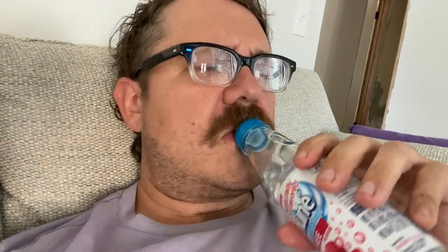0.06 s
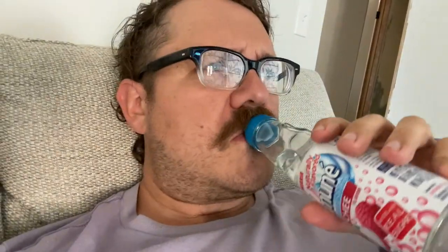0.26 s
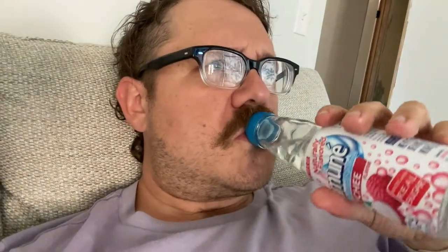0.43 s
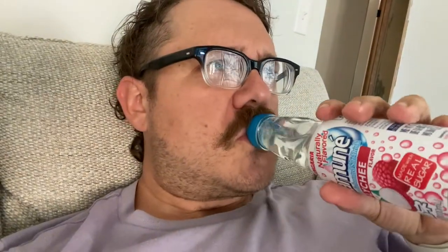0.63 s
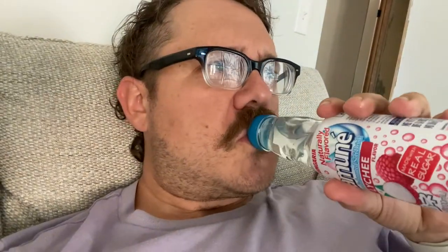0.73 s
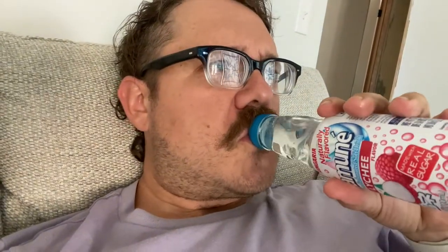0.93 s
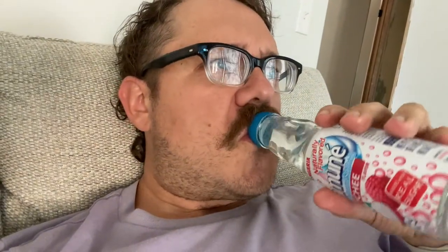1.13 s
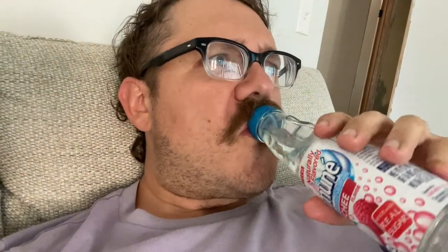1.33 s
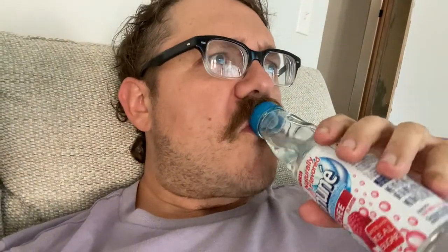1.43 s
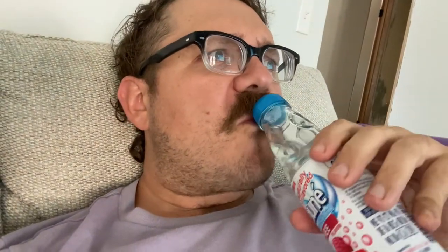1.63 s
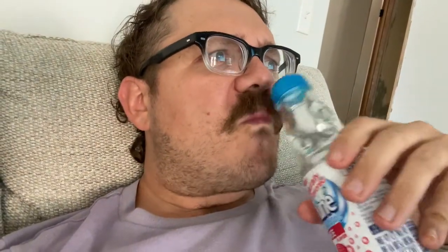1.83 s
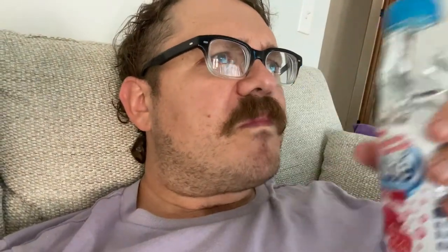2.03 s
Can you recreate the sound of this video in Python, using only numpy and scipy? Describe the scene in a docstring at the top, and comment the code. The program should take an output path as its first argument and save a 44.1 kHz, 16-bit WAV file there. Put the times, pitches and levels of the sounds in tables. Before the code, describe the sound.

A glass marble in a soda bottle neck rolls barely audibly from 0.4 seconds, then clinks in a light, quick, fading cluster at 0.7. Sparse faint ticks follow until 1.4, with a tiny hiss and bubbles near 1.33. At 1.44 it drops back in a loud, bright rattle with short bubble plips, fading by 1.6. One faint bubble at 1.87. Close, small room, low steady hum throughout.

```python
"""A low machine hum and air rumble run throughout, as slightly wavering tones and shaped noise.
A glass marble rolls faintly in the neck of a tipped soda bottle (uneven noise driving the glass modes), then ticks.
As the bottle is lowered the drink hisses (a narrow rising noise band) and bubbles ring (decaying, rising sines).
The marble drops back and rattles: each contact sums decaying glass modes and a short crack, damped by the drink.
A small living room answers every bottle sound with early echoes and a swelling noise tail."""
import sys
import numpy as np
from scipy import signal
from scipy.fft import rfft, irfft, next_fast_len
from scipy.io import wavfile
from scipy.ndimage import map_coordinates

SR = 44100
rng = np.random.default_rng(int(sys.argv[2]) if len(sys.argv) > 2 else 0)


def unload_audio(sound):
    """Save the sound as a 16-bit wav file, at the path given as the first command line argument."""
    columns = np.transpose(np.atleast_2d(sound))
    # keep every value between -1 and 1, then stretch to whole-number steps
    steps = np.round(np.clip(columns, -1, 1) * 32767)
    wavfile.write(sys.argv[1], SR, steps.astype(np.int16))


N = 91728  # length of the scene [samples]

CLINK_DB = 1.5  # gain added to every contact [dB]
STRIKE_S = .0004  # time constant of the onset of a contact [s]
CRACK_DB, CRACK_T60_S = -7.5, .012  # crack level before its colour [dB], decay by 60 dB [s]
MODE_SCATTER_DB, MODE_DETUNE = 2.2, .003  # standard deviation of mode level [dB] and of pitch [fraction]
ROLL_GRAIN, ROLL_SCRAPE_DB = .4, -6  # unevenness [log amplitude per unit wobble], scrape over ring [dB]
BUBBLE_RISE_S = .001  # time constant of the onset of a bubble [s]
EARLY_DB, EARLY_T60_S, WALL_DELAY_S = -12.5, .07, .002  # near surfaces: level [dB], decay [s], delay [s]
ROOM_BUILD_S = .014  # time scale of the swell of the tail [s]
HUM_DRIFT, HUM_FLUTTER_DB = .17, -1.75  # phase [rad] and level [dB] per unit wobble
AIR_DB = -42.5  # rms level of the air rumble [dB]
TOP_HZ = 12950  # band limit of the recorder [Hz]


def clinks():
    """Impact excitation: each contact rings the glass modes under a short broadband crack."""
    # marble contacts: (time [s], level before CLINK_DB [dB], lowest mode [dB], middle modes [dB],
    # top modes [dB], ring length [share of the modes' t60])
    contacts = [(.6681, -63, 28, 17, -6, .2), (.6928, -24, -2, 3, 3, .6), (.7127, -28.5, 0, 5, 4, .55),
                (.7295, -35, 5, 6, 6, .55), (.7415, -45, 7, 5, 0, .5), (.7495, -46, 6, 8, 0, .5),
                (.8030, -52, 13, 10, -2, .9), (.8841, -40, 5, 3, -14, .6), (1.0408, -34.5, 3, 4, 1, .6),
                (1.0722, -48, 6, 7, -2, .7), (1.3351, -51, 6, 8, -2, .4), (1.3905, -44, 2, 3, -7, .5),
                (1.4388, -9, -7, -4, -1, .6), (1.4399, -7.5, -7, -5, -1, .75),
                (1.4643, -16, 1.5, -2, 0, .8), (1.4768, -21.5, -3, 1, 2, .7),
                (1.5025, -18.5, -7, -1, 0, .4), (1.5097, -16.5, 1, -1, 3, .6), (1.5125, -15, 5, 1, 3, 1.1),
                (1.5305, -17, -6, -6, -6, .55), (1.5984, -35, 1, 7, 1, .6), (1.612, -47, 17, 8, 2, .8)]
    out = np.zeros((2, N))
    t = np.arange(SR // 6) / SR
    onset = 1 - np.exp(-t / STRIKE_S)
    for s, db, *colour, length in contacts:
        crack_decay = amp(CRACK_DB - 60 * t / CRACK_T60_S)
        crack = crack_decay * contact_noise(rng.standard_normal(len(t)), colour)
        glass = ring(position_at(s), colour, length)
        add(out, s, in_room(amp(db + CLINK_DB) * (glass + crack) * onset))
    return out


def rolling():
    """Random excitation: uneven noise scrapes and rings the same glass, whose modes follow the tilt."""
    # short swells of rolling: (time of peak [s], half-length [s], rms level at peak [dB],
    # lowest mode [dB], middle modes [dB], top modes [dB])
    swells = [(.43, .016, -64, -2, -5, -12), (.46, .045, -69, 5, 0, -12), (.585, .036, -59.5, 15, 6, -5),
              (.66, .035, -68, 14, 7, -8), (1.33, .02, -61, 10, 8, -4), (1.395, .035, -57, 7, 7, -8),
              (1.49, .035, -47, -3, 0, 0), (1.56, .045, -52, 1, 1, 2), (1.885, .03, -71, 2, 4, -6)]
    out = np.zeros(N)
    for s, half_s, db, *colour in swells:
        grains = rng.standard_normal(N) * np.exp(ROLL_GRAIN * wobble(400))
        response = ring(position_at(s), colour, length=.78)
        glass = unit(signal.fftconvolve(grains, response)[:N])
        scrape = amp(ROLL_SCRAPE_DB) * unit(contact_noise(grains, colour))
        out += amp(db) * swell(s, half_s) * unit(glass + scrape)
    return in_room(out)[:, :N]


def ring(position, colour, length):
    """Modal superposition: decaying sines sum to the ring, their pitch and level set by the tilt."""
    # modes of the bottle, shifting with tilt, with a brief bright click on top: (pitch tipped [Hz],
    # level tipped [dB], pitch lowered [Hz], level lowered [dB], t60 before the length share [s])
    modes = [(2907, -5.5, 3190, -6.5, .05), (3800, -9, 3800, -15, .008), (4635, -8, 4650, -14, .03),
             (5475, -16, 5710, -18, .035), (5900, -17, 6000, -13, .014), (7900, -12, 7570, -15, .03),
             (8100, -16, 7830, -10, .018), (8300, -16, 8570, -14, .025), (8350, -5, 8790, -2, .025),
             (8640, -11, 9010, -12, .022), (10200, 2, 9700, -6.5, .008), (10650, -10, 11000, -21, .012),
             (12430, -24, 12130, -20, .016)]
    out = 0
    t = np.arange(SR // 6) / SR
    for hz_up, db_up, hz_down, db_down, t60 in modes:
        hz = hz_up + position * (hz_down - hz_up)
        hz = hz * (1 + MODE_DETUNE * rng.standard_normal())
        db = db_up + position * (db_down - db_up) + colour_db(hz, colour)
        db = db + MODE_SCATTER_DB * rng.standard_normal()
        decay = amp(db - 60 * t / (t60 * length))
        out = out + decay * np.sin(2 * np.pi * (hz * t + rng.random()))
    return out


def contact_noise(x, colour):
    """High modal density: overlapping short modes of the glass act as a smooth filter on noise."""
    # spectrum of the dense short modes: (frequency [Hz], relative level [dB])
    dense_modes = [(300, -14.5), (900, -7.5), (1800, -7), (2600, -4), (3700, 7.5), (5000, 0.5), (6000, -7),
                   (7000, -2.5), (8000, 2), (9300, 0.5), (10500, -13), (12200, -15.5), (13300, -43)]
    plain = filtered(x, lambda hz: amp(along(dense_modes, hz)))
    coloured = filtered(x, lambda hz: amp(along(dense_modes, hz) + colour_db(hz, colour)))
    return coloured / np.std(plain)  # the colour still changes the level


def colour_db(hz, colour):
    """Modal participation: the spot of contact weights each frequency against the 8 kHz ring."""
    low, middle, top = colour
    points = [(2000, middle), (3000, low), (4000, middle), (6000, middle), (8000, 0), (9000, 0), (10000, top)]
    return along(points, hz)


def position_at(s):
    """Kinematics: how far the bottle is lowered at time s, linear between points."""
    # path of the bottle: (time [s], position [0 tipped up, 1 lowered])
    path = [(.4, .5), (.58, .14), (.69, 0), (.8, 0), (1.04, .3), (1.33, .85), (1.44, 1), (1.52, 1.03)]
    return np.interp(s, *np.transpose(path))


def hiss():
    """Narrowband noise: a rising carrier under random modulation, as drink starts to run past the marble."""
    # one hiss: (time of peak [s], half-length [s], pitch at peak [Hz], width [Hz],
    # rise [octaves/s], rms level at peak [dB])
    s, half_s, hz, width_hz, rise, db = (1.33, .016, 5650, 800, 1.2, -62)
    t = np.arange(N) / SR
    phase = 2 * np.pi * np.cumsum(hz * 2 ** (rise * (t - s))) / SR
    band = unit(wobble(width_hz) * np.sin(phase) + wobble(width_hz) * np.cos(phase))
    return in_room(amp(db) * swell(s, half_s) * band)[:, :N]


def bubbles():
    """Bubble resonance: air pockets ring as damped oscillators, rising in pitch as the drink runs back."""
    # bubbles in the drink: (time [s], starting pitch [Hz], level [dB], t60 [s], rise [octaves/s])
    pockets = [(1.315, 1810, -57, .2, 1), (1.352, 2760, -56, .15, 3), (1.4395, 1245, -32, .07, 1),
               (1.441, 2130, -39, .07, 1), (1.466, 2200, -32, .06, 1.5), (1.482, 2270, -34.5, .1, 1.5),
               (1.502, 2370, -36, .05, 2), (1.528, 1300, -46, .2, .4), (1.53, 3650, -42, .08, 3),
               (1.538, 2570, -46, .15, .5), (1.874, 2300, -49, .03, 1)]
    out = np.zeros((2, N))
    t = np.arange(SR // 5) / SR
    onset = 1 - np.exp(-t / BUBBLE_RISE_S)
    for s, hz, db, t60, rise in pockets:
        phase = 2 * np.pi * np.cumsum(hz * 2 ** (rise * t)) / SR
        add(out, s, in_room(amp(db - 60 * t / t60) * onset * np.sin(phase)))
    return out


def in_room(x):
    """Impulse response: direct sound with a stereo phase spread, near reflections and a swelling diffuse tail."""
    # decay of the tail as picked up, short at the top: (frequency [Hz], t60 [s])
    tail_t60 = [(300, 0.18), (1500, 1), (3200, 0.35), (8500, 0.37), (12000, 0.04)]
    # level of the tail as picked up, dull at the top: (frequency [Hz], level [dB])
    tail_level = [(1000, -18), (3200, -14), (5500, -12), (7500, -12.5), (8800, -21.5), (10500, -19.5),
                  (12500, -21.5)]
    # left-minus-right phase of the recorder's stereo sound: (frequency [Hz], phase [rad])
    stereo_phase = [(300, 0), (1200, -1), (2400, -2.1), (2950, -2), (3200, -4.4), (3900, -5.3), (4650, -4),
                    (6000, -6), (7600, -6.9), (8800, -5.2), (10200, -3.4), (12400, -.8)]
    # noise decays at its own rate in each frequency band
    hz, t, z = signal.stft(rng.standard_normal((2, SR // 2)), SR, nperseg=256)
    decay = amp(-60 * t / along(tail_t60, hz)[:, None])
    tail = signal.istft(z * decay, SR, nperseg=256)[1]
    t = np.arange(tail.shape[1]) / SR
    tail = tail * (1 - np.exp(-(t / ROOM_BUILD_S) ** 2))
    tail = filtered(tail / np.linalg.norm(tail[0]), lambda hz: amp(along(tail_level, hz)))
    early = rng.standard_normal(tail.shape) * amp(-60 * t / EARLY_T60_S) * (t > WALL_DELAY_S)
    echo = tail + amp(EARLY_DB) * early / np.linalg.norm(early[0])
    out = signal.fftconvolve(x[None], echo, axes=1)
    sides = np.array([[1], [-1]])  # half the phase to each side
    direct = filtered(x, lambda hz: np.exp(.5j * along(stereo_phase, hz) * sides))
    add(out, 0, direct)
    return out


def background():
    """Tones and partly coherent noise: a slightly unsteady machine hum over the rumble of moving air."""
    # hum tones: (pitch [Hz], rms level about which it flutters [dB])
    tones = [(59.2, -47.5), (119.3, -43.5), (533, -70.5), (1023, -74)]
    # spectrum of the air: (frequency [Hz], relative density [dB per Hz])
    air_spectrum = [(25, -25.5), (38, -18), (52, 0.5), (80, 0), (110, -5), (165, -4), (200, -9), (245, -16),
                    (310, -13.5), (410, -22), (550, -18.5), (1000, -27.5), (1350, -35), (2000, -41),
                    (3200, -47.5), (5000, -58), (8800, -57), (10500, -71.5), (13000, -62)]
    # left-right likeness of the air: (frequency [Hz], correlation [-1..1])
    likeness = [(60, 0.95), (150, 0.83), (300, 0.62), (600, -0.49), (1500, -0.027), (8000, -0.14)]
    # balance of the air: (frequency [Hz], left minus right [dB])
    balance = [(120, 1), (350, -1.5), (650, -5), (1200, -2), (3000, -1.5), (10000, -1.5)]
    t = np.arange(N) / SR
    hum = np.zeros(N)
    for hz, db in tones:
        level = np.sqrt(2) * amp(db + HUM_FLUTTER_DB * wobble(10.0))
        hum += level * np.sin(2 * np.pi * hz * t + HUM_DRIFT * wobble(2.8))

    def mid_side(hz):
        """Coherence: the cosine of twice the mixing angle is the left-right correlation."""
        angle = np.arccos(np.clip(along(likeness, hz), -1, 1)) / 2
        return amp(along(air_spectrum, hz)) * [np.cos(angle), np.sin(angle)]

    mid, side = filtered(rng.standard_normal((2, N)), mid_side)
    halves = np.array([[.5], [-.5]])
    air = filtered(np.array([mid + side, mid - side]), lambda hz: amp(along(balance, hz) * halves))
    return hum + amp(AIR_DB) * unit(air)


def swell(s, half_s):
    """Gaussian envelope: a bell-shaped rise and fall around time s."""
    return np.exp(-((np.arange(N) / SR - s) / half_s) ** 2 / 2)


def wobble(rate):
    """Band-limited randomness: a smooth curve through random knots, rate of them a second."""
    knots = rng.standard_normal(int(N * rate / SR) + 4)
    return map_coordinates(knots, [np.arange(N) * rate / SR])


def amp(db):
    """Logarithmic level: decibels to amplitude gain."""
    return 10 ** (np.asarray(db) / 20)


def unit(x):
    """Normalisation: scale to an rms of 1."""
    return x / np.sqrt(np.mean(x ** 2) + 1e-20)


def along(points, hz):
    """Logarithmic frequency: interpolate (frequency [Hz], value) points on a log axis."""
    f, v = np.transpose(points)
    return np.interp(np.log(hz + 1), np.log(f + 1), v)


def filtered(x, response):
    """Linear filtering: multiply the spectrum of x by a response of frequency."""
    n = x.shape[-1]
    m = next_fast_len(n + 8192)  # padded against wrap-around
    return irfft(rfft(x, m) * response(np.fft.rfftfreq(m, 1 / SR)), m)[..., :n]


def add(track, s, sound):
    """Superposition: mix a sound into a track at time s, cut at the track's end."""
    part = track[..., round(s * SR):][..., :sound.shape[-1]]
    part += sound[..., :part.shape[-1]]


def scene():
    """Superposition of marble, drink and background."""
    return clinks() + rolling() + hiss() + bubbles() + background()


def record(dry):
    """Band limitation: a steep low-pass, as the recorder keeps almost nothing above its band limit."""
    return filtered(dry, lambda hz: 1 / np.sqrt(1 + (hz / TOP_HZ) ** 80))


dry = scene()
out = record(dry)
unload_audio(out)
```